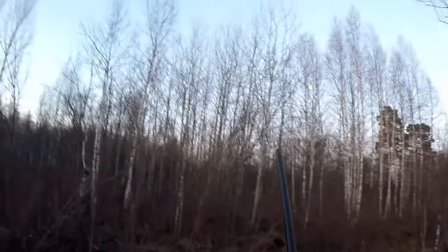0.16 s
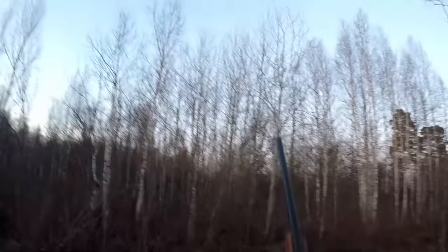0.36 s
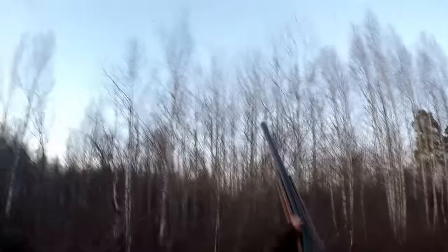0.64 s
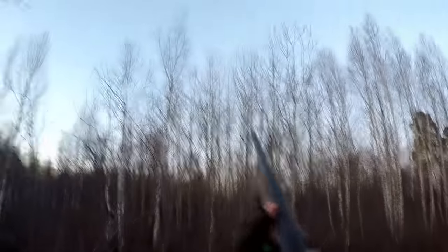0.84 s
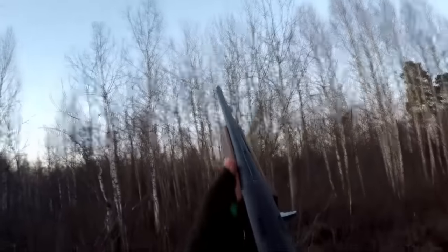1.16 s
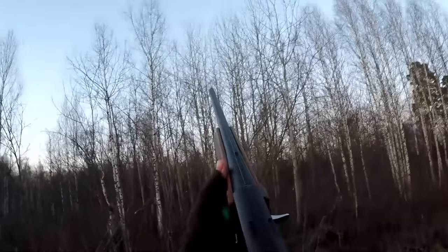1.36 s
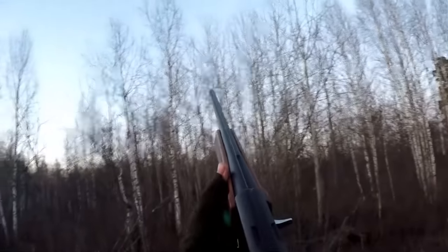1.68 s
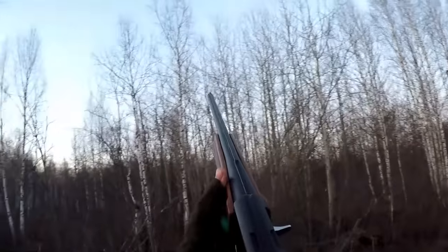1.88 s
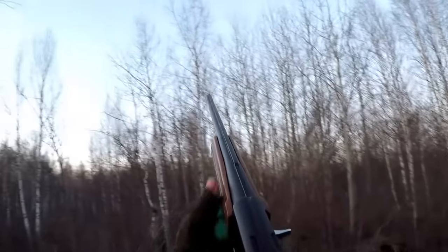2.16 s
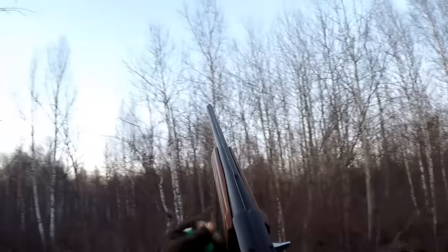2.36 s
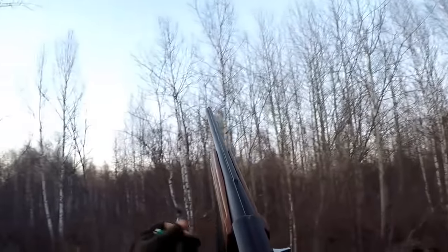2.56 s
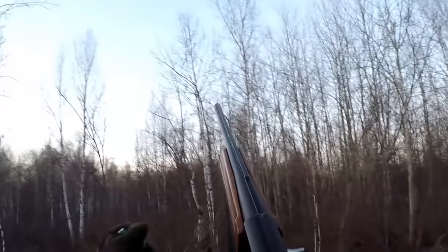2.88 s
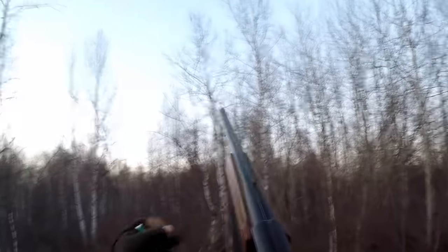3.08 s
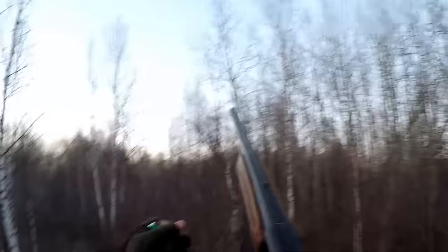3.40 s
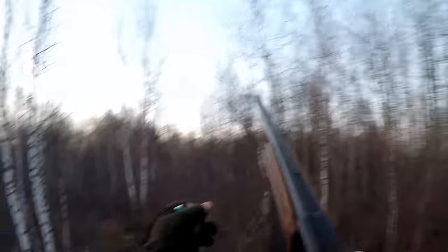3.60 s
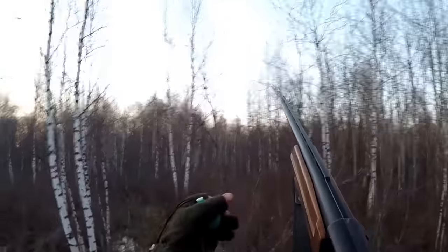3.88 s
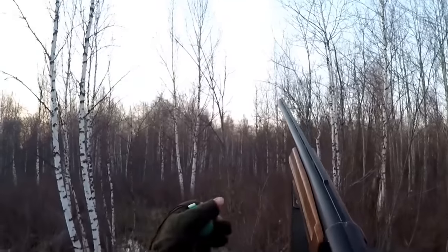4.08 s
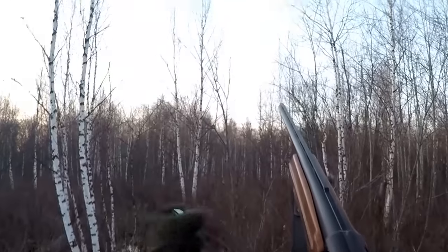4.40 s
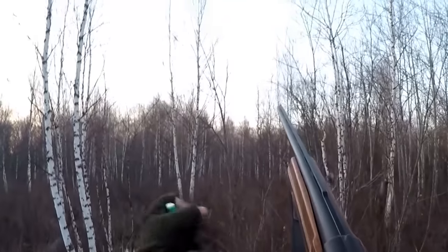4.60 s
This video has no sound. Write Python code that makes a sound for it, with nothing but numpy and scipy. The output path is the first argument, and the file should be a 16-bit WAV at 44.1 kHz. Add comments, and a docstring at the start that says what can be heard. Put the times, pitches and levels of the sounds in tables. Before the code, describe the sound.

Still dusk air in bare birch woodland, with soft low rumble and very faint, tiny chirps and twitters throughout. At 0 s the trees still ring from an earlier squeak, and a woodcock's thin whistle dives and cuts off near 0.13 s with a short airy scatter. At 0.3 s, close by, a lifted gun gives a hollow double knock of wood and metal; sleeves rub until about 1.2 s, with a crisp cluster of clicks at 0.75 s. Sparse light ticks follow at 1.4 and 1.9 s, a sharper click with a faint swish at 2.1 s, and a last tap at 2.4 s. At 2.8 s the bird squeaks loudly: a reedy upward yelp, a needle-thin whistle, then a second reedy chirp diving at 3.0 s, with hissy echo. Quiet returns, with faint chirps near 3.9 s. A similar piercing double squeak comes at 4.3 to 4.5 s, its echo fading.

```python
"""Dusk in a birch wood: hushed air, rumble, faint chirps and twitters (short sine glides) throughout.
At the start trees still ring from an earlier squeak; a woodcock's first squeak dives and ends near 0.13 s.
A hunter lifts a shotgun: hollow knocks (struck modes) at 0.3 s, sleeve rustle and clicks (noise) to 2.5 s.
Squeaks at 2.8 and 4.3 s sweep up, thin to a high whistle and dive: two coupled syrinx voices.
The trees scatter each squeak back as random delayed copies; airy hiss surrounds it."""
import sys
import numpy as np
from scipy import signal
from scipy.fft import rfft, irfft
from scipy.io import wavfile
from scipy.ndimage import uniform_filter1d

SR = 44100
rng = np.random.default_rng(int(sys.argv[2]) if len(sys.argv) > 2 else 0)


def master(y):
    """Save y as 16-bit WAV."""
    cut = np.clip(np.atleast_2d(y).T, -1, 1)
    pcm = np.round(cut * 32767)  # scale
    wavfile.write(sys.argv[1], SR, pcm.astype(np.int16))


N = 209430
TIME = np.arange(N) / SR


def amp(db):
    """Decibels to gain."""
    return 10 ** (np.asarray(db) / 20)


def unit(x):
    """Scales to rms 1."""
    return x / np.sqrt(np.mean(x ** 2) + 1e-20)


def tint(x, colour):
    """Zero-phase filter from rows of f/Hz, gain/dB, interpolated over log frequency."""
    hz, db = np.transpose(colour)
    bins = np.fft.rfftfreq(len(x), 1 / SR)
    gain = amp(np.interp(np.log(bins + 1), np.log(hz), db))
    return irfft(rfft(x) * gain, len(x))


def noise(colour):
    """Coloured Gaussian noise, rms 1."""
    return unit(tint(rng.standard_normal(N), colour))


def wobble(hz):
    """Smooth random signal, rms 1; Gaussian roll-off, 1/e at hz."""
    roll_off = np.exp(-(np.fft.rfftfreq(N, 1 / SR) / hz) ** 2)
    return unit(irfft(rfft(rng.standard_normal(N)) * roll_off, N))


def level(rows):
    """Gain over time from rows of t/s, level/dB."""
    return amp(np.interp(TIME, *np.transpose(rows)))


def resonate(x, hz, width_hz):
    """One resonance, peak gain 1."""
    return signal.lfilter(*signal.iirpeak(hz, hz / width_hz, SR), x)


def add(mix, s, sound):
    """Mixes a sound in at time s, in place."""
    part = mix[max(round(s * SR), 0):][:len(sound)]
    part += sound[:len(part)]


def swell(t, rise_s, fall_s):
    """Gaussian hump, 1 at t = 0, 1/e at -rise_s and fall_s."""
    return np.exp(-(t / np.where(t < 0, rise_s, fall_s)) ** 2)


def ramp(t, length_s):
    """Linear rise from 0 to 1 after t = 0."""
    return np.clip(t / length_s, 0, 1)


def phase_of(hz, jitter):
    """Integrates pitch to phase/rad; jitter = rms relative pitch flutter."""
    flutter = unit(uniform_filter1d(rng.standard_normal(len(hz)), size=16))
    return 2 * np.pi * np.cumsum(hz * (1 + jitter * flutter)) / SR


# still evening air: f/Hz, relative density/dB
AIR_COLOUR = [(59, -31), (100, 2), (135, -10.5), (153, -5), (283, -8.5), (398, -10), (784, -14), (854, -14),
              (950, -13), (1720, -16.5), (4020, -17.5), (14700, -31), (16000, -43)]
# rumble of air and handling on the microphone: t/s, relative level/dB
RUMBLE_COURSE = [(0.0, -63), (0.38, -57.5), (0.71, -58), (0.74, -50), (1.23, -61), (3.78, -61), (3.98, -67),
                 (4.27, -57.5), (4.75, -63)]
# rumble spectrum: f/Hz, relative density/dB
RUMBLE_COLOUR = [(8, -10), (25, 1), (50, -4.5), (100, -13.5), (160, -18), (300, -38), (1000, -78.5)]


def air(hush_db=-64.5, rumble_db=1.7):
    """Broadband air noise over low rumble of varying level."""
    hush = amp(hush_db) * noise(AIR_COLOUR)
    return hush + amp(rumble_db) * level(RUMBLE_COURSE) * noise(RUMBLE_COLOUR)


def twitters(per_s=10, pitch_hz=3850, spread=.09, length_s=.018, loudest_db=-66, range_db=7):
    """Very distant birds: short pips at random times, pitch-jittered."""
    out, t = np.zeros(N), np.arange(0, length_s, 1 / SR)
    for when, pitch, far in rng.random((int(per_s * N / SR), 3)):
        hz = np.full(len(t), pitch_hz * (1 + spread * (2 * pitch - 1)))
        effort = amp(loudest_db - range_db * far) * np.hanning(len(t))
        add(out, when * N / SR, effort * np.sin(phase_of(hz, spread)))
    return out


# faint chirps: t/s, length/s, start f/Hz, end f/Hz, level/dB before blur
CHIRPS = [(0.061, 0.036, 3600, 4400, -49), (0.079, 0.033, 4400, 3300, -49),
          (0.393, .016, 4530, 7140, -53.5), (0.467, 0.015, 6530, 4630, -66),
          (0.836, 0.037, 6500, 5800, -63), (0.892, 0.012, 6690, 6100, -62),
          (2.024, 0.016, 5200, 7420, -63.5), (3.915, 0.022, 4200, 7300, -60),
          (3.991, 0.015, 6800, 4300, -62)]


def faint_chirps(blur_db=-4, blur_t60_s=.074):
    """Short sine glides, plus a blurred copy from decaying-noise convolution."""
    out, t = np.zeros(N), TIME[:SR // 4]
    for s, length_s, start_hz, end_hz, db in CHIRPS:
        hz = np.linspace(start_hz, end_hz, int(length_s * SR))
        add(out, s, amp(db) * np.hanning(len(hz)) * np.sin(2 * np.pi * np.cumsum(hz) / SR))
    blur = rng.standard_normal(len(t)) * amp(-60 * t / blur_t60_s)
    blur /= np.linalg.norm(blur)
    return out + amp(blur_db) * signal.fftconvolve(out, blur)[:N]


# rubbing cloth: f/Hz, relative density/dB
SLEEVE_COLOUR = [(59, -31), (100, -2), (149, -10), (346, -4), (607, -8), (684, -8.5), (1040, -14),
                 (1250, -12.5), (1460, -13.5), (5720, -25.5), (12000, -41.5), (15600, -71.5), (22000, -120)]
# sleeves rub as arms move: peak t/s, rise/s, fall/s, level/dB
ARM_MOVES = [(0, .1, 0.19, -59.5), (.5, 0.16, 0.19, -53.5), (.76, 0.12, 0.14, -57), (.95, 0.062, .17, -58)]
# soft swishes of cloth and glove: start t/s, end t/s, level/dB, centre f/Hz, width per stage/Hz
SWISHES = [(-.08, 0.102, -55.5, 260.8, 260), (0.923, 0.98, -52, 1250, 402), (0.943, 1.075, -55, 1206, 301),
           (2.04, 2.136, -61, 6000, 1500), (2.059, 2.155, -58, 1430, 2470)]


def clothes(weave_hz=1300, weave_width_hz=200, weave_db=-9, slip_hz=120, slip_depth=1.1):
    """Cloth slides in small uneven slips with a faint weave band; swishes are band noise."""
    slips = amp(slip_depth * wobble(slip_hz))  # depth in dB rms
    weave = unit(resonate(rng.standard_normal(N), weave_hz, weave_width_hz))
    rub = unit((noise(SLEEVE_COLOUR) + amp(weave_db) * weave) * slips)
    out = sum(amp(db) * swell(TIME - s, rise_s, fall_s) for s, rise_s, fall_s, db in ARM_MOVES) * rub
    for start_s, end_s, db, hz, width_hz in SWISHES:
        stroke = np.sin(np.pi * np.clip((TIME - start_s) / (end_s - start_s), 0, 1))
        band = resonate(resonate(rng.standard_normal(N), hz, width_hz), hz, width_hz)
        out += amp(db) * stroke * unit(band)
    return out


# clicks and bumps of gun and glove: t/s, relative level/dB, ring f/Hz, t60/s
CLICKS = [(.396, -40, 1200, .025), (.746, -40, 890, 0.029), (0.7525, -34.5, 250, 0.041),
          (0.7564, -24.5, 2650, 0.011), (0.775, -20.5, 5200, 0.0053), (0.778, -27, 2640, 0.014),
          (0.819, -44, 1300, 0.024), (.944, -41, 1233, 0.032), (1.405, -47.5, 3465, 0.016),
          (1.449, -46, 3200, 0.021), (1.922, -41, 2700, .02), (1.927, -33.5, 1072, 0.019),
          (2.134, -25, 3200, 0.017), (2.429, -37.5, 978, .014)]
# click filter: f/Hz, gain/dB
CLICK_COLOUR = [(100, 11), (500, 3), (1200, 1), (3500, 0.5), (6500, -8), (9000, -10), (15000, -16)]


def clicks(ring_db=6, ring_width_hz=600, body_hz=1000, body_width_hz=340, body_db=-1,
           rattle_db=-27, rattle_t60_s=.12, attack_s=.00021, click_db=-5):
    """Decaying noise snaps: each excites its own ring and the body of the gun."""
    out, t = np.zeros(N), TIME[:SR // 10]
    for s, db, hz, t60_s in CLICKS:
        decay = amp(-60 * t / t60_s) + amp(rattle_db - 60 * t / rattle_t60_s)
        snap = rng.standard_normal(len(t)) * decay * (1 - np.exp(-t / attack_s))
        band_hz = [hz / 3, min(2 * hz, SR / 3)]
        crack = signal.lfilter(*signal.butter(1, band_hz, "bandpass", fs=SR), snap)
        ring = amp(ring_db) * resonate(snap, hz, ring_width_hz)
        body = amp(body_db) * resonate(snap, body_hz, body_width_hz)
        add(out, s, amp(db + click_db) * (crack + ring + body))
    return tint(out, CLICK_COLOUR)


# blows as the gun is lifted: t/s, relative level/dB
KNOCKS = [(0.302, -38), (0.309, -38), (0.3141, -25), (0.3339, -37), (0.3379, -32.5), (0.3944, -45),
          (.405, -44)]
# hollow ring of the gun: f/Hz, relative level/dB, t60/s
GUN_MODES = [(416, -10.5, 0.089), (440, -10.5, 0.073), (502, -22, 0.26), (809, -10, 0.11),
             (1097, -0.5, 0.067), (1115, -17, 0.075), (1497, -11.5, 0.054), (1570, -19.5, 0.041),
             (1940, -15.5, 0.038), (2480, -20, 0.025)]


def knocks(scuff_db=-18, scuff_t60_s=.073, attack_s=.0018):
    """Each blow rings the gun's modes, plus a brief contact scuff."""
    out, t = np.zeros(N), TIME[:SR // 3]
    ring = sum(amp(db - 60 * t / t60_s) * np.sin(2 * np.pi * hz * t) for hz, db, t60_s in GUN_MODES)
    for s, db in KNOCKS:
        grit = resonate(resonate(rng.standard_normal(len(t)), 1300, 3000), 1900, 3000)
        scuff = amp(scuff_db - 60 * t / scuff_t60_s) * unit(grit)
        add(out, s, amp(db) * (ring + scuff) * (1 - np.exp(-t / attack_s)))
    return out


# hiss round the sweeps, one list a stretch: t/s, body level/dB, centre f/Hz, top sizzle level/dB
HISS = [
    [(.11, -49.5, 4990, -80.5), (.2, -55.5, 5400, -67.5), (.27, -51, 6540, -76), (.34, -57.5, 5600, -60.5),
     (.41, -71, 5600, -79)],
    [(2.79, -54.5, 4600, -63.5), (2.99, -54, 5200, -73.5), (3.06, -52.5, 5600, -71.5),
     (3.2, -56.5, 5800, -71), (3.245, -69, 5800, -72)],
    [(4.29, -51, 4900, -49), (4.44, -54.5, 5390, -57.5), (4.56, -53.5, 5580, -60), (4.66, -59.5, 5750, -69),
     (4.77, -60, 5880, -55)],
]
# broad skirt of the hiss: f/Hz, relative density/dB
HISS_SKIRT = [(1200, -23.5), (2800, 1), (4000, 2.5), (7000, -3.5), (10000, -8.5), (15000, -18.5)]


def hiss(width_hz=1250, skirt_db=-7, top_hz=14000, top_width_hz=3000, fade_s=.01):
    """Airy hiss between and after sweeps: noise resonance of moving centre, skirt and top band."""
    out, r = np.zeros(N), np.exp(-np.pi * width_hz / SR)
    for rows in HISS:
        s, db, hz, top_db = np.transpose(rows)
        # low-passed noise shifted up to the moving centre
        turn = np.exp(2j * np.pi * np.cumsum(np.interp(TIME, s, hz)) / SR)
        low = signal.lfilter([1], [1, -2 * r, r * r], rng.standard_normal(N))
        body = unit((turn * low).real) + amp(skirt_db) * noise(HISS_SKIRT)
        top = resonate(resonate(rng.standard_normal(N), top_hz, top_width_hz), top_hz, top_width_hz)
        gate = np.clip(np.minimum(TIME - s[0], s[-1] - TIME) / fade_s, 0, 1)
        out += gate * amp(np.interp(TIME, s, db)) * body
        out += gate * amp(np.interp(TIME, s, top_db)) * unit(top)
    return out


# echo filter: f/Hz, gain/dB
ECHO_COLOUR = [(1500, -17.5), (2700, -7.5), (4000, -3.5), (5200, -3), (6200, -4.5), (8000, -3), (12000, 0)]
# echo course: t after the sound/s, relative level/dB
ECHO_COURSE = [(.004, 3), (.022, 12.5), (.05, 3.5), (.11, -7.5), (.19, -5.5), (.225, -8), (.25, -24),
               (.4, -38)]
# trees still ringing from an earlier squeak: t/s, level/dB
LINGER = [(0, -49.5), (.05, -54.5), (.1, -57.5), (.16, -79.5)]
# spectrum of that ring: f/Hz, relative density/dB
LINGER_COLOUR = [(1180, -43.5), (2000, -16.5), (2600, -20), (3430, 0.5), (5100, -11.5), (6090, -7),
                 (9430, -20.5), (15000, -13.5)]


def birches(x, echo_db=-30, returns_per_s=4000):
    """Trunks return faint copies at random delays; an earlier squeak's ring is fading noise."""
    trunks = rng.standard_normal(N) * (rng.random(N) < returns_per_s / SR) * level(ECHO_COURSE)
    echo = tint(unit(trunks[:SR // 2]), ECHO_COLOUR) / np.sqrt(SR / 2)
    linger = level(LINGER) * noise(LINGER_COLOUR) * (TIME < LINGER[-1][0])
    return amp(echo_db) * signal.fftconvolve(x, echo)[:N] + linger


def partial(k, hz, phase):
    """Harmonic k of a sweep, faded over the last 4 kHz below half the sample rate."""
    return np.sin(k * phase) * np.clip((SR / 2 - k * hz) / 4000, 0, 1)


# throat favours the harmonic passing 5 kHz: f/Hz, gain/dB
THROAT = [(2000, -24), (2450, -17), (2700, -13), (3300, -7), (4300, -2), (5200, 0), (6100, -3), (7000, -11),
          (8500, -19), (10500, -24), (13500, -20.5), (16000, -24)]


def reed(hz, jitter=.011, harmonic_step_db=-4):
    """Loud, reedy side of the syrinx: six harmonics shaped by the throat."""
    phase, out = phase_of(hz, jitter), 0
    for k in range(1, 7):
        db = np.interp(k * hz, *np.transpose(THROAT)) + harmonic_step_db * (k - 1)
        out = out + amp(db) * partial(k, hz, phase)
    return out


ATTACK_S, WHISTLE_RELEASE_S = .0009, .0055
POP_LIFT_HZ, POP_S = 800, .0013  # pop at the break of register


def whistle(t, length_s, break_hz, knee_hz, bend_s, drift_hz_per_s, curve=1.5, jitter=.0015, octave_db=-22):
    """Thin, pure side: away from the break (t/s) pitch bends over at a knee, then drifts up."""
    bend = np.exp(-(t / bend_s) ** curve)
    hz = knee_hz + drift_hz_per_s * t + (break_hz - knee_hz) * bend
    phase = phase_of(hz, jitter)
    gate = ramp(t, ATTACK_S) * ramp(length_s - t, WHISTLE_RELEASE_S)
    return gate * (partial(.99, hz, phase) + amp(octave_db) * partial(2, hz, phase))


CLIMB_FROM_HZ, CLIMB_TO_HZ = 2500, 4425
YELP_HZ, YELP_AFTER_S, YELP_RISE_S, YELP_FALL_S = 5090, .0103, .0048, .0016


def opening(climb_s, climb_db, pop_db, yelp_db, release_s=.0028,
            under_db=-21, under_hz=3050, under_hz_per_s=340000, under_after_s=.0033):
    """Reedy climb, pop and yelp; an undertone slides up around the break."""
    t = np.arange(-climb_s, 2 * YELP_AFTER_S, 1 / SR)
    pop = swell(t, POP_S, POP_S)
    hz = np.interp(t, [-climb_s, 0, YELP_AFTER_S], [CLIMB_FROM_HZ, CLIMB_TO_HZ, YELP_HZ])
    hz += POP_LIFT_HZ * pop
    effort = amp(climb_db) * ramp(t + climb_s, ATTACK_S) * swell(t, np.inf, release_s)
    effort += amp(pop_db) * pop
    effort += amp(yelp_db) * swell(t - YELP_AFTER_S, YELP_RISE_S, YELP_FALL_S)
    late = t - under_after_s
    under = swell(late, POP_S, POP_S) * np.sin(phase_of(under_hz + under_hz_per_s * late, 0))
    return effort * reed(hz) + amp(under_db) * under


def closing_whistle(length_s, glide, db, tremble_db, swell_db, swell_s, tremble_hz=54, swell_lead_s=.017):
    """Whistle drifts down to a knee, then falls and swells into the break."""
    t = np.arange(length_s, 0, -1 / SR)  # time left until the break
    tremble = np.cos(2 * np.pi * tremble_hz * (length_s - t - WHISTLE_RELEASE_S))
    effort = amp(db + tremble_db * tremble)
    effort += amp(swell_db) * swell(t, swell_s, swell_s) * ramp(swell_lead_s - t, ATTACK_S)
    return effort * whistle(t, length_s, *glide)


DIVE_FROM_HZ, DIVE_TO_HZ, DIVE_S, CREST_RISE_S, CREST_FALL_S = 4300, 2680, .014, .0028, .0056


def dive(bend_s, pop_db, crest_s, crest_db, trail_db, trail_s, pop_fall_s=.0037, cut_s=.0016,
         trail_jitter=.077, sag_hz=230, sag_s=.0025):
    """Reedy voice pops in, dives, crests and sags as it is cut off; a rough, faint tone trails."""
    t = np.arange(0, trail_s, 1 / SR)
    hz = DIVE_TO_HZ + (DIVE_FROM_HZ - DIVE_TO_HZ) * swell(t, bend_s, bend_s)
    hz += POP_LIFT_HZ * swell(t, POP_S, POP_S / 2)
    hz -= sag_hz * swell(t - DIVE_S, sag_s, np.inf)
    effort = amp(pop_db) * swell(t, POP_S, pop_fall_s)
    effort += amp(crest_db) * swell(t - crest_s, CREST_RISE_S, CREST_FALL_S)
    gate = ramp(t, ATTACK_S / 2) * ramp(DIVE_S - t, cut_s)
    trail = amp(trail_db) * np.sin(np.pi * t / trail_s) * np.sin(phase_of(hz, trail_jitter))
    return gate * effort * reed(hz) + trail


# squeak opens (levels relative): break t/s, climb length/s, climb level/dB, pop level/dB,
# yelp level/dB, whistle level/dB, whistle length/s
OPENINGS = [(2.7876, .0116, -5, -19.5, -5.5, -22.5, .055), (4.2891, .0106, -10.5, -4.5, -4, -25, .049)]
# whistle falls to the break (levels relative): break t/s, length/s, break f/Hz, knee f/Hz, bend/s,
# drift/(Hz/s), level/dB, tremble/dB, swell level/dB, swell length/s
FALLS = [(0.1126, .074, 4700, 9433, .0125, 84750, -42.5, 8, -8.5, .0108),
         (3.0014, 0.043, 6150, 11460, 0.012, 20070, -19, 0.5, -13, 0.0044),
         (4.505, .057, 6150, 11430, .011, 19960, -21.5, 0, -10, 0.0029)]
# reedy dive closes (levels relative): break t/s, bend/s, pop level/dB, crest delay/s, crest level/dB,
# trail level/dB, trail length/s
DIVES = [(0.114, .0024, -3.5, 0.0037, -8.3, -47, 0.035), (3.0006, .0045, -2, 0.0065, -4, -37, .036),
         (4.5047, 0.0044, -2, .0072, -.5, -45, 0.023)]
# whistle sings best at its knee: f/Hz, gain/dB
WHISTLE_COLOUR = [(6500, 0.5), (8000, -3), (9600, -3), (11000, -1), (11800, 3), (12500, -1), (12900, -4.5),
                  (15000, -0.5)]
# small beak radiates little bass: f/Hz, gain/dB
BEAK = [(200, -26), (900, -5), (1500, -6.5), (2200, 0)]
# whistle climbing out of each opening: break f/Hz, knee f/Hz, bend/s, drift/(Hz/s)
UP_GLIDE = (7400, 11850, .0103, 22000)


def woodcock(overlap_s=.0008, coupling=.25, rough_db=-29, rough_hz=4500):
    """Two syrinx voices; their product adds modulation where they overlap."""
    reedy, pure = np.zeros(N), np.zeros(N)
    for s, climb_s, climb_db, pop_db, yelp_db, whistle_db, length_s in OPENINGS:
        add(reedy, s - climb_s, opening(climb_s, climb_db, pop_db, yelp_db))
        t = np.arange(0, length_s, 1 / SR)
        add(pure, s, amp(whistle_db) * whistle(t, length_s, *UP_GLIDE))
    for s, length_s, *glide, db, tremble_db, swell_db, swell_s in FALLS:
        fall = closing_whistle(length_s, glide, db, tremble_db, swell_db, swell_s)
        add(pure, s + overlap_s - length_s, fall)
    for s, *shape in DIVES:
        add(reedy, s, dive(*shape))
    pure = tint(pure, WHISTLE_COLOUR)
    roughness = 1 + amp(rough_db) * wobble(rough_hz)  # rough noise that follows the reedy voice's level
    return tint(reedy * roughness + pure + coupling * reedy * pure, BEAK)


def scene():
    """Air, twitters, chirps, hunter, hiss, echo and the bird overhead."""
    bird = woodcock()
    background = air() + twitters() + faint_chirps()
    hunter = clothes() + clicks() + knocks()
    return (background + hunter + hiss() + birches(bird) + bird)[None]


def record(dry, shadow_db=-22, treble_hz=10500, shift_hz=4000, edge_hz=15700):
    """Rounds off loud peaks, adds faint side tones shift_hz either side of the treble, band-limits."""
    dry = dry / (1 + (dry / .9) ** 8) ** (1 / 8)
    high_pass = signal.firwin(31, treble_hz, pass_zero=False, fs=SR)
    treble = signal.oaconvolve(dry, high_pass[None], "same")
    side_tones = 2 * treble * np.cos(2 * np.pi * shift_hz * TIME)
    low_pass = signal.firwin(255, edge_hz, window=("kaiser", 9), fs=SR)
    return signal.oaconvolve(dry + amp(shadow_db) * side_tones, low_pass[None], "same")


dry = scene()
out = record(dry)
master(out)
```